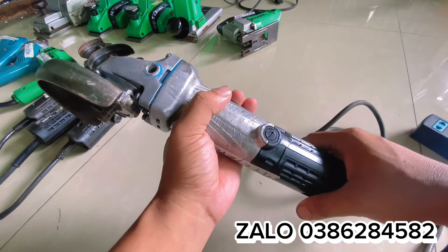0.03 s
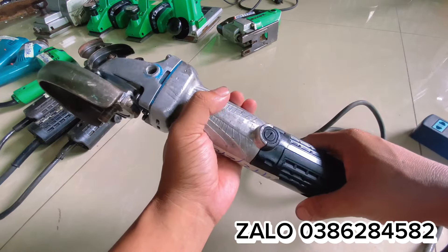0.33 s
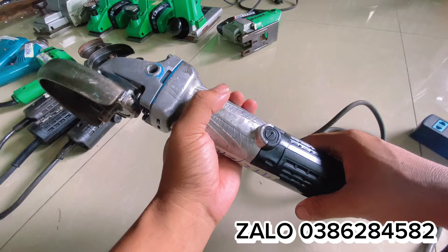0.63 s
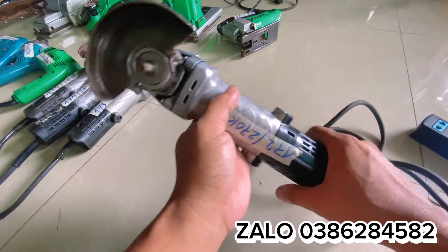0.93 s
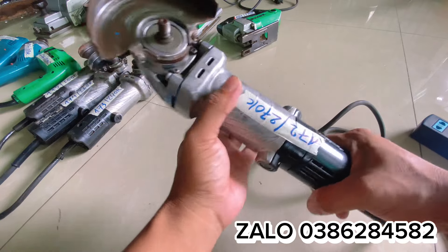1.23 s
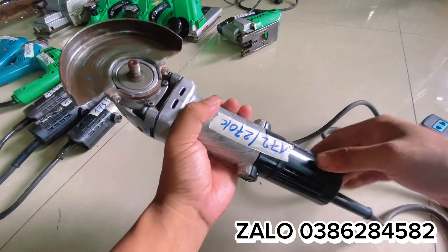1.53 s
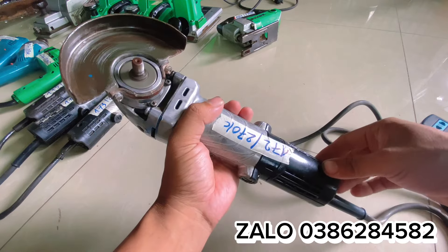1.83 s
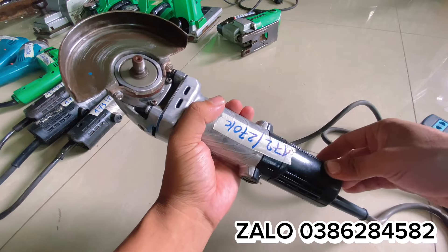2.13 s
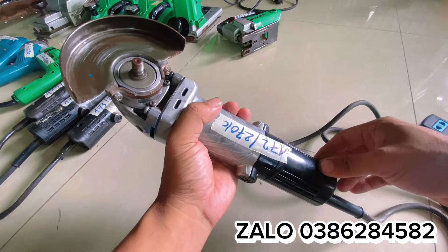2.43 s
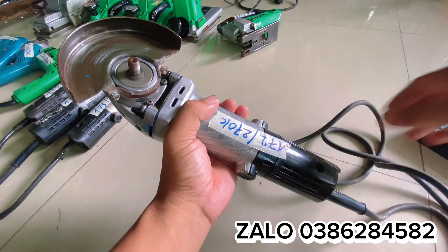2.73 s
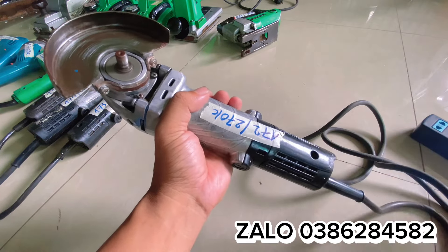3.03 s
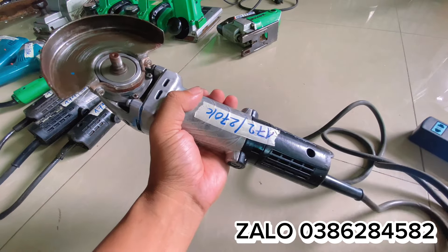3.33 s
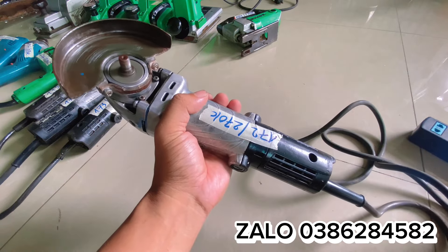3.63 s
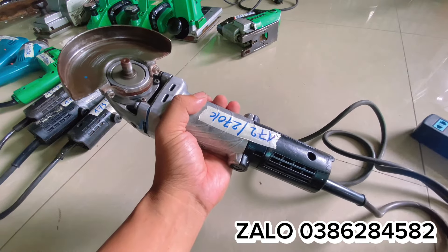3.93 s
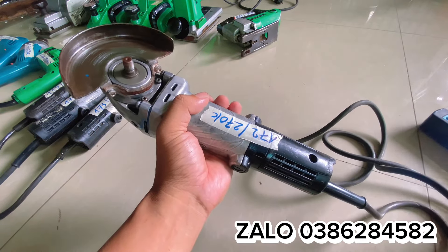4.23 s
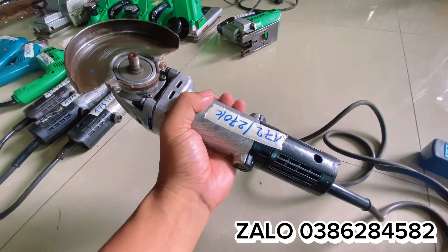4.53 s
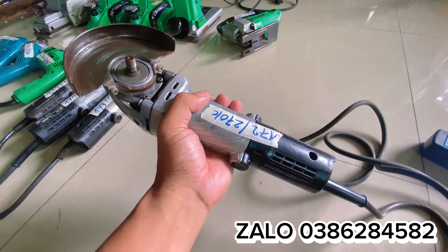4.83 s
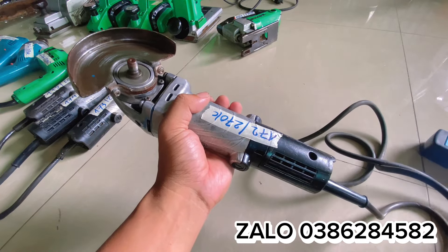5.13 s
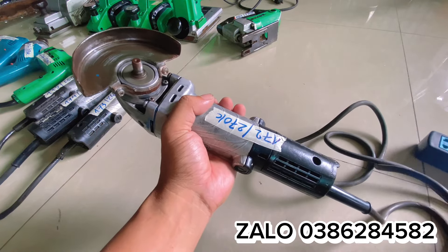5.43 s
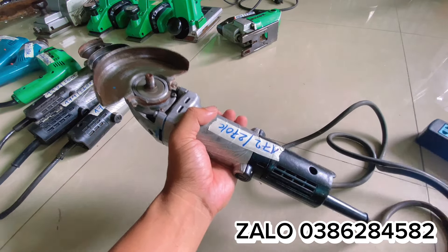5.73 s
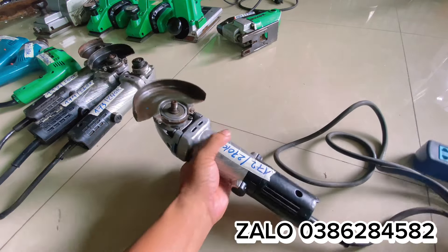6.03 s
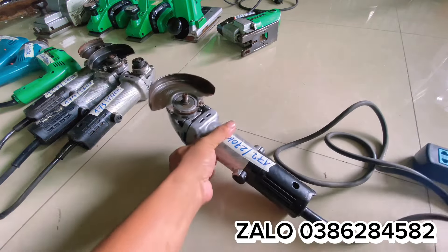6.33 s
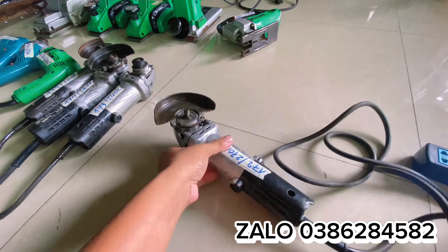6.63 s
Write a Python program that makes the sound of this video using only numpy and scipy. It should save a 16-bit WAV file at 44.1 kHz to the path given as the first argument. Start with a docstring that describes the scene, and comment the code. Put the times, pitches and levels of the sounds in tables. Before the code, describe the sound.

From the start, an angle grinder is running at full speed with no load: a high, steady whine over rushing fan air and a metallic gear chatter. Its tone shifts slightly as it is turned in the hands, with a soft handling bump at about 0.9 seconds and a few sharp clacks between 1 and 2 seconds. At about 2 seconds it is switched off and begins coasting. The whine glides steadily down and the rush of air fades. From about 4 to 6 seconds the slack gears stand out as irregular clicks and ticks, growing softer as the motor slows. A faint, grainy metal rasp comes at about 5.8 seconds. From 6.2 to 6.8 seconds the tool stops and is laid on a tiled floor with several clinks and dull thuds, the strongest near 6.7 seconds. It is heard close up in a hard room with short reverberation.

```python
"""Angle grinder coasting down

With no disc, it runs free in a hand, is switched off at two seconds and coasts to a stop.
Its fan rushes, shaft, ball bearings and brushes whine, and slack bevel gears chatter in the metal
head, ever more sparsely. It is laid on a tiled floor with a rasp, clinks and thuds.
A close pair of microphones hears it in a hard room."""
import sys
import numpy as np
from scipy import signal
from scipy.fft import rfft, irfft, next_fast_len
from scipy.io import wavfile
from scipy.ndimage import uniform_filter1d

SR = 44100
rng = np.random.default_rng(int(sys.argv[2]) if len(sys.argv) > 2 else 0)


def log_audio(samples):
    """Write samples as a 16-bit WAV file to the path given in sys.argv[1]."""
    # one column per channel
    frames = np.atleast_2d(samples).T
    # limit to full scale, then quantise
    limited = np.clip(frames, -1, 1)
    pcm = np.round(limited * 32767).astype(np.int16)
    wavfile.write(sys.argv[1], SR, pcm)


N = 303849

# roll of the tool in the hands: t/s, angle/quarter turns
ROLL_ANGLE = [(0.4, 0), (0.95, 1), (1.5, 2)]
# modes of gear head and guard: f/Hz, width/Hz, lift/dB
HEAD_MODES = [(1380, 130, 2.5), (2340, 200, 0.5), (2890, 260, 2), (4810, 340, 3.5), (6093, 173, 12),
              (6940, 74, 13.5)]
# loudest backlash clacks: t/s, crack/dB, head ring/dB re crack
BACKLASH_CLACKS = [(1.0885, -18, -20), (1.212, -15.5, -18.5), (1.766, -12.5, -24), (3.9854, -19, -17),
                   (4.2926, -22, -12), (4.421, -26, -4), (4.558, -25, -9), (4.578, -21.5, -11),
                   (4.6772, -20.5, -8), (4.744, -28, -7), (4.77, -32, -3), (4.787, -30, -2),
                   (4.807, -28, -9), (4.9575, -29, -8), (5.005, -32, -6), (5.164, -30, -5),
                   (5.177, -34, -3), (5.2, -33, -2), (5.2329, -20, -10), (5.281, -36, 3), (5.307, -35, -2),
                   (5.347, -37, -10.5), (5.382, -30, -5), (5.415, -30, -2), (5.435, -35, -2),
                   (5.4605, -28.5, -2), (5.4955, -28, -7), (5.556, -31, -4), (5.637, -30, -3),
                   (5.661, -31.5, -3), (5.6989, -28.5, -9), (5.7538, -33, -4), (5.7875, -31, -10),
                   (5.818, -28, -17), (5.871, -37, -7), (5.897, -35, -13), (5.9075, -39, -2),
                   (5.9265, -34.5, -4), (5.9455, -34, -18), (6.1034, -40, -14)]
# low rumble of room and grip: f/Hz, density/dB
RUMBLE_SPECTRUM = [(20, -30), (55, 0), (90, -2), (140, -11), (400, -16), (1000, -22), (4000, -30),
                   (8000, -43), (15000, -60)]


def amp(db):
    """Decibels to gain."""
    return 10 ** (np.asarray(db) / 20)


def unit(x):
    """Scale to rms 1."""
    return x / np.sqrt(np.mean(x ** 2) + 1e-20)


def along(points, hz):
    """Interpolate (f/Hz, value) points on a log axis."""
    f, v = np.transpose(points)
    return np.interp(np.log(hz + 1), np.log(f + 1), v)


def curves(rows):
    """One value per sample for each column after the time."""
    s, *cols = np.transpose(rows)
    return [np.interp(np.arange(N) / SR, s, c) for c in cols]


def wobble(rate_hz):
    """Smooth random curve through rate_hz knots a second."""
    knots = rng.standard_normal(int(N * rate_hz / SR) + 4)
    fine = signal.resample(knots, len(knots) * 10)
    return np.interp(np.arange(N) * rate_hz * 10 / SR, np.arange(len(fine)), fine)


def resonance(hz, centre_hz, width_hz):
    """Bell curve, 1 at its centre."""
    return 1 / (1 + (2 * (hz - centre_hz) / width_hz) ** 2)


def filtered(x, response):
    """Apply a complex frequency response."""
    m = 2 * next_fast_len((N + SR // 2) // 2)
    return irfft(rfft(x, m) * response(np.fft.rfftfreq(m, 1 / SR)), m)[..., :N]


def coloured(x, spectrum, modes=(), size=8192):
    """Minimum-phase filter of unit power: a broad spectrum plus resonances."""
    hz = np.fft.rfftfreq(size, 1 / SR)
    db = along(spectrum, hz) + sum(lift * resonance(hz, f, width) for f, width, lift in modes)
    cepstrum = irfft(np.log(unit(amp(db))))
    cepstrum[1:len(hz) - 1] *= 2
    cepstrum[len(hz):] = 0
    impulse = irfft(np.exp(rfft(cepstrum)))
    return signal.oaconvolve(x, impulse[None], axes=1)[:, :N]


def bursts(times_s, sizes, t60_s):
    """Envelope that jumps at each time and decays."""
    power = np.bincount(np.clip(times_s * SR, 0, N - 1).astype(int), sizes ** 2, N)
    decay = np.exp(-2 * np.log(1000) / (t60_s * SR))
    return np.sqrt(signal.lfilter([1], [1, -decay], power))


def hiss():
    """White noise of a spread-out source: each microphone hears a shared part and its own."""
    # unshared part: f/Hz, level/dB re shared
    spread = [(100, -10), (600, 0), (1300, -13.5), (1950, -5.5), (2300, -5.5), (2850, -7.5), (3200, -4),
              (3700, -3), (4200, 5), (4600, -8), (5100, 15.5), (6000, -16), (7100, -2), (8300, 4),
              (14000, 26)]
    m = 2 * next_fast_len(N // 2 + 1, real=True)
    own = amp(along(spread, np.fft.rfftfreq(m, 1 / SR)))
    z = rfft(rng.standard_normal((3, m)))
    return irfft((z[0] + own * z[1:]) / np.hypot(1, own), m)[:, :N]


def shaft_speed(friction_rps_per_s=83.8, drag_rps=401.4):
    """Turns/s: powered, then braked by dry friction and square-law fan drag, equal at drag_rps."""
    # sag under power, switch-off at the last row: t/s, speed/rps
    powered = [(0, 577), (0.2, 573.5), (0.5, 571.8), (1.2, 571.2), (1.5, 568.8), (2.036, 566)]
    off_s, off_rps = powered[-1]
    t = np.arange(N) / SR
    braking = friction_rps_per_s / drag_rps * np.maximum(t - off_s, 0)
    coast_rps = drag_rps * np.tan(np.arctan(off_rps / drag_rps) - braking)
    return np.maximum(np.where(t < off_s, curves(powered)[0], coast_rps), 1)


def coast_db(rps, full_db, fall_db, knee_halvings=0, stall_db=0):
    """Level that loses fall_db per halving of speed, and stall_db more per halving past the knee."""
    halvings = np.log2(rps.max() / rps)
    return full_db - fall_db * halvings - stall_db * np.maximum(halvings - knee_halvings, 0)


def fan(air_db):
    """Cooling air rushes out through the vents."""
    # fan air: f/Hz, density/dB
    air = [(40, -43), (150, -27.5), (340, -15.5), (500, -16), (800, -8), (1000, -9), (1250, 2), (1500, 0.5),
           (1950, -4.5), (2500, -6.5), (4000, 0.5), (7000, -13.5), (10500, -21), (15000, -82.5)]
    # cavities behind the vents: f/Hz, width/Hz, lift/dB
    cavities = [(4810, 300, 4.5), (5840, 68, 11), (6190, 79, 8.5), (6970, 130, -3)]
    return amp(air_db + 5.5 + 0.9 * wobble(14)) * coloured(hiss(), air, cavities)


def bearing_shimmer(rps, air_db, passes_per_turn=2.79, width_orders=0.012, steps_per_turn=128):
    """Ball-pass overtones, split by the shaft's turning: faint, wavering partials that fall with speed."""
    # bearing overtones: f/Hz, density/dB
    spectrum = [(900, -23), (1400, -4), (2700, -13), (3300, 6), (5000, -0.5), (7000, -17), (9000, -38)]
    turns = np.cumsum(rps) / SR
    m = 2 * next_fast_len(int(turns[-1] * steps_per_turn) // 2 + 1)
    orders = np.fft.rfftfreq(m, 1 / steps_per_turn)
    offsets = [(orders - k * passes_per_turn + 0.5) % 1 - 0.5 for k in range(1, 5)]
    lines = sum(np.exp(-(offset / width_orders) ** 2) for offset in offsets)
    band = (orders > 6) & (orders < steps_per_turn / 4)
    pattern = irfft(rfft(rng.standard_normal(m)) * lines * band, m)
    swarm = np.interp(turns * steps_per_turn, np.arange(m), unit(pattern))
    return amp(air_db + 1 + 2.2 * wobble(70)) * coloured(swarm[None], spectrum)


def gears(rps, chatter_db, scatter_db=4.0, soft_share=0.83):
    """Slack teeth strike at random and ring the head, fewer and softer as the shaft slows."""
    # hard tooth impacts: f/Hz, density/dB
    hard_spectrum = [(100, -54), (600, -27.5), (900, -17.5), (1070, -25.5), (1400, -10), (2500, -4),
                     (3300, 6), (4200, -5.5), (5500, -6.5), (6950, -6), (7300, -20), (8000, -17.5),
                     (8800, -25.5), (11000, -29.5), (12500, -90), (15000, -55)]
    # slow, soft contacts: f/Hz, density/dB
    soft_spectrum = [(500, -23.5), (850, -3.5), (1070, -16), (1350, -2), (1650, -6), (2400, -3.5),
                     (2700, -2.5), (3000, -1.5), (3250, 1.5), (3480, -2), (3650, 9), (3850, -2.5),
                     (4000, -7), (4250, -3), (5000, -8.5), (7000, -38)]
    hits_per_s = 2.5 * (rps + 60)
    hits = rng.random(N) < hits_per_s / SR
    sizes = amp(scatter_db * np.clip(rng.standard_normal(N), -2, 2))[hits]
    strikes = bursts(np.flatnonzero(hits) / SR, sizes, t60_s=0.023)
    chatter = amp(chatter_db + 1.5) * unit(strikes / np.sqrt(hits_per_s))
    softness = np.clip(soft_share * (1 - rps / rps.max()), 0, 1)
    clack_s, crack_db, _ = np.transpose(BACKLASH_CLACKS)
    clacks = bursts(clack_s + 0.0016, amp(crack_db - 0.5), t60_s=0.02)
    blows = np.hypot(np.sqrt(1 - softness) * chatter, clacks)
    hard = coloured(uniform_filter1d(blows, size=30) * hiss(), hard_spectrum, HEAD_MODES)
    return hard + coloured(np.sqrt(softness) * chatter * hiss(), soft_spectrum)


def tones(rows, rps, slip, flutter_db=2.5, swell_octaves=0.31):
    """Beamed, shaft-locked sines glide through the casing's response; slip blurs them as it slows."""
    # casing radiation: f/Hz, gain/dB
    radiation = [(200, -16), (330, -5.5), (540, -13.5), (700, -2.5), (820, 1.5), (940, 1.5), (1040, -5),
                 (1150, -1.5), (1320, 7.5), (1480, 5), (1600, -2.5), (1880, -2), (2150, -0.5), (2450, 3.5),
                 (2740, -4.5), (2950, -2), (3180, 6.5), (3400, 5), (3750, 6), (4300, -3), (4900, 6.5)]
    angle = 2 * np.pi * np.cumsum(rps) / SR
    halvings = np.log2(rps.max() / rps)
    below_half = np.maximum(halvings - 1, 0)
    roll, = curves(ROLL_ANGLE)
    out = np.zeros(N)
    for order, *facing_db, half_db, swell_hz, swell_db in rows:
        hz = order * rps
        full_db = np.interp(roll, np.arange(len(facing_db)), facing_db)
        db = full_db + (half_db - full_db) * np.minimum(halvings, 1) - 12 * below_half
        db += swell_db * np.exp(-(np.log2(hz / swell_hz) / swell_octaves) ** 2)
        jitter_rad = slip * np.sqrt(order) * (1 + 1.6 * below_half) * wobble(60)
        wave = np.sin(order * angle + jitter_rad + rng.uniform(0, 2 * np.pi))
        out += np.sqrt(2) * amp(db + along(radiation, hz) + flutter_db * wobble(25)) * wave
    return out


def whine(rps, hum_db):
    """The unbalanced armature hums; its harmonics and the rolling balls sing through the casing."""
    # unbalance hum through the casing: f/Hz, level/dB
    hum_response = [(100, -88), (180, -72), (250, -60.5), (340, -53), (460, -51), (535, -37), (575, -39.5)]
    # shaft harmonics: order, full-speed level/dB (as first held, side-on, turned over),
    # half-speed level/dB, swell f/Hz, swell/dB
    shaft_tones = [(2, -45.5, -35.5, -42.5, -58.5, 425, 9.5), (3, -40, -40.5, -52, -60.5, 635, 10.5),
                   (4, -37.5, -39.5, -45, -59.5, 1510, 2)]
    # ball-pass tones and sidebands: same columns
    bearing_tones = [(1.79, -57, -51, -60, -63, 750, 11), (2.578, -40, -44, -42.5, -54, 316, 10),
                     (2.79, -44.5, -42.5, -40, -48.5, 720, 6), (3.58, -56, -61, -62, -59, 1630, 13),
                     (4.58, -37, -49, -43, -53.5, 1700, 10.5), (4.79, -33.5, -28, -36, -52, 1240, 9),
                     (5.58, -49, -58, -45.5, -55.5, 790, 8), (6.37, -61, -60, -48, -61, 2280, 9),
                     (6.585, -40, -37, -35.5, -54, 2300, 6), (7.59, -34.5, -37, -39.5, -60.5, 900, 10),
                     (7.68, -58, -57, -70, -49, 1900, 4), (8.575, -56, -52, -44, -56.5, 2550, 9),
                     (9.7, -68, -69, -75, -48, 1680, 4), (10.37, -55, -46, -51, -59, 2500, 8)]
    angle = 2 * np.pi * np.cumsum(rps) / SR
    hum = np.sqrt(2) * amp(along(hum_response, rps) + hum_db + 0.1 * wobble(17)) * np.sin(angle)
    harmonics = amp(-1.5) * tones(shaft_tones, rps, slip=0.21)
    return hum + harmonics + amp(-1.3) * tones(bearing_tones, rps, slip=0.13)


def brushes(rps, bars=24, octave_rps=130, octave_limit_hz=15200):
    """Carbon brushes whistle over the commutator bars; slowing, they gain an octave and hiss less."""
    # whistle through the brush holders: f/Hz, level/dB
    holders = [(1500, -84), (3000, -70), (4400, -64), (5400, -59), (6100, -58), (6900, -78), (8200, -72),
               (9000, -63), (10200, -56), (12000, -68), (13700, -60.5)]
    # brush friction: f/Hz, density/dB
    friction = [(2000, -26), (6800, -36.5), (7700, -6), (8700, 29), (10500, -1), (12500, -43), (15000, -30)]
    hz = bars * rps
    angle = 2 * np.pi * np.cumsum(hz) / SR + 0.4 * wobble(40)
    fundamental = amp(along(holders, hz)) * np.sin(angle)
    octave_db = along(holders, 2 * hz) - 25 * np.maximum(np.log2(rps / octave_rps), 0)
    octave = (2 * hz < octave_limit_hz) * amp(octave_db) * np.sin(2 * angle)
    facing_db = 4 * np.maximum(curves(ROLL_ANGLE)[0] - 1, 0) * (rps / rps.max()) ** 2
    whistle = np.sqrt(2) * amp(facing_db + 3 * wobble(33)) * (fundamental + octave) * (rps > 1)
    return whistle + amp(coast_db(rps, full_db=-49, fall_db=13)) * coloured(hiss(), friction)


def room(x, delay_samples=150):
    """Hard-room reverberation: decay varies with frequency, and each microphone has its own tail."""
    # room decay: f/Hz, t60/s
    decay = [(150, 0.57), (1000, 0.71), (4000, 0.56), (12000, 0.18)]
    send_db = [(200, -11), (570, -21), (1100, -13), (6000, -12)]  # f/Hz, gain/dB
    hz, t, z = signal.stft(rng.standard_normal((2, SR // 2)), SR, nperseg=256)
    tail = signal.istft(z * amp(-60 * t / along(decay, hz)[:, None]), SR, nperseg=256)[1]
    send = filtered(x, lambda f: amp(along(send_db, f)))
    delayed = np.pad(send, [(0, 0), (delay_samples, 0)])
    return signal.fftconvolve(delayed, tail / np.linalg.norm(tail[0]), axes=1)[:, :N]


def room_rumble():
    """The room's low rumble, swelling a little as the hands move."""
    # rumble: t/s, level/dB
    levels = [(0, -65), (1.3, -62), (1.55, -75), (2.8, -70.5), (3.2, -68), (5.8, -65.5), (6.6, -68.5)]
    noise = rng.standard_normal(N) + 0.64 * rng.standard_normal((2, N))
    return amp(curves(levels)[0]) * coloured(noise, RUMBLE_SPECTRUM)


def grip(at_s=0.87, width_s=0.069, rumble_db=-48, pan_db=7.0):
    """The shifting grip bumps and briefly rumbles, mostly on the left."""
    # soft bumps of the hands: t/s, level/dB, f/Hz, half-width/s
    bump_rows = [(0.873, -34, 210, 0.005), (.896, -30, 227, 0.0025), (.897, -42, 343, 0.016),
                 (0.906, -36.5, 140, 0.0059), (0.917, -42.5, 55, 0.025), (5.972, -51.5, 410, 0.0026),
                 (5.978, -55, 290, 0.004)]
    t = np.arange(N) / SR
    bumps = sum(amp(db) * np.exp(-((t - s) / half_s) ** 2) * np.sin(2 * np.pi * hz * (t - s))
                for s, db, hz, half_s in bump_rows)
    swell = np.exp(-((t - at_s) / width_s) ** 2)
    rumble = amp(rumble_db) * swell * coloured(rng.standard_normal((2, N)), RUMBLE_SPECTRUM)
    return amp([[pan_db], [-pan_db]]) * (bumps + rumble)


def head_ring(mode_hz=3635, t60_s=0.012, attack_s=0.0011, lift_db=7.5):
    """Hard clacks ring the head's strongest mode, in step at both microphones."""
    out, t = np.zeros(N), np.arange(SR // 20) / SR
    for at_s, crack_db, ring_db in BACKLASH_CLACKS:
        hz = mode_hz * (1 + rng.normal(0, 0.01))
        envelope = amp(crack_db + ring_db + lift_db - 60 * t / t60_s) * (1 - np.exp(-t / attack_s))
        out[round(at_s * SR):][:len(t)] += envelope * np.sin(2 * np.pi * hz * t)
    return out


def rasp(grains_per_s=170, start_s=5.82, attack_s=0.041, end_s=6.56, release_s=0.16, fade_db_per_s=14):
    """Faint, grainy rasp of metal as the tool comes to rest."""
    # metal rasp: f/Hz, density/dB
    spectrum = [(300, -15), (850, -5), (1070, -10), (1500, 5), (1950, 5), (2450, -17), (3200, 4),
                (3750, -6), (4300, -22.5), (7000, -8.5), (9000, -53)]
    t = np.arange(N) / SR
    times_s = np.flatnonzero(rng.random(N) < grains_per_s / SR) / SR
    grains = unit(bursts(times_s, amp(2.8 * rng.standard_normal(len(times_s))), t60_s=0.018))
    gate = np.clip(np.minimum((t - start_s) / attack_s, (end_s - t) / release_s), 0, 1)
    level_db = -50 - fade_db_per_s * np.maximum(t - start_s - attack_s, 0)
    return gate * amp(level_db) * coloured(grains * hiss(), spectrum, HEAD_MODES)


def floor_knocks(note_t60_s=0.063, note_attack_s=0.002):
    """Each touch on the tiles clinks the guard and thuds the body, which gives a short, dull note."""
    # floor contacts: t/s, level/dB, thud/dB re level, body note f/Hz, note/dB re level
    contacts = [(6.217, -30, -11, 555, -9), (6.284, -38.5, -8, 530, -8), (6.356, -38, -28, 550, -28),
                (6.622, -51, -10, 550, -28), (6.6318, -39.5, -15, 554, -31),
                (6.6966, -26.5, -3.5, 256, -18), (6.734, -24.5, -8, 182, -10), (6.796, -41, -4, 300, -19)]
    # steel guard on tile: f/Hz, density/dB
    guard = [(300, -9), (2000, 5.5), (4000, 5), (6000, 1.5), (7000, 8), (7800, -16), (11000, -40),
             (15000, -59)]
    # tool body on tile: f/Hz, density/dB
    body = [(40, -36), (120, -7.5), (190, 0.5), (310, -1.5), (440, -8), (560, -4), (700, -10.5), (870, -6),
            (1060, -22), (1400, -4), (1750, 0), (2000, -16), (2400, -25), (5000, -17), (12000, -46)]
    times_s, db, thud_db, _, _ = np.transpose(contacts)
    clink = coloured(bursts(times_s, amp(db - 6), t60_s=0.061) * hiss(), guard, HEAD_MODES)
    blows = bursts(times_s, amp(db + thud_db - 2), t60_s=0.11)
    thud = coloured(uniform_filter1d(blows, size=60) * hiss(), body)
    note, t = np.zeros(N + SR), np.arange(SR // 8) / SR
    for at_s, level_db, _, hz, note_db in contacts:
        envelope = amp(level_db + note_db - 60 * t / note_t60_s) * (1 - np.exp(-t / note_attack_s))
        note[round(at_s * SR):][:len(t)] += envelope * np.sin(2 * np.pi * hz * t)
    return clink + thud + note[:N]


def scene(beam_hz=5000, beam_width_hz=500, lead_s=0.00018):
    """The head, left of centre, reaches the left microphone first; the brushes lie straight ahead."""
    # directivity as the tool rolls: t/s, chatter/dB, air/dB, hum/dB, beamed band/dB
    facing = [(0, 0.5, 1.5, 1, -1), (.55, 1, 0.7, 1.5, -1), (.75, 3, 1, 1, -3.5), (1.0, 0, 3, 1, -7),
              (1.35, 1.8, 1.5, 0.3, 0), (1.85, 2, 1.5, -2, 0.5), (2.2, -1, 0.5, -4, 0.5),
              (2.6, -0.5, 0.5, -1, -1.5)]
    # casing modes, out of step to the two sides: f/Hz, width/Hz, lift/dB, extra left lead/rad
    casing = [(1004, 176, 0.5, 1.8), (1600, 130, -1.5, -0.78), (1667, 160, -3, 0.054),
              (1920, 130, -2.5, 0.063), (2440, 240, 2.5, 0.14), (2700, 140, -0.5, 0.092),
              (2716, 50, -2, -1.15), (2890, 100, -2, 0.014), (4340, 300, -1, -0.63), (6020, 960, -1.5, -1),
              (7180, 480, -1, 1.28)]
    # balance: f/Hz, left minus right/dB
    balance = [(60, -1.5), (200, 0), (350, 1.5), (570, 0.5), (720, 1), (900, -6), (1150, 5), (1600, -2),
               (2300, -2), (3400, 2.5), (4300, 1), (6800, 0), (8400, -4), (11000, 1)]

    def casing_gain(hz):
        return amp(sum(db * resonance(hz, f, width) for f, width, db, _ in casing))

    def lead_rad(hz):
        return 2 * np.pi * hz * lead_s + sum(rad * resonance(hz, f, width) for f, width, _, rad in casing)

    rps = shaft_speed()
    chatter_db, air_db, hum_db, beam_db = curves(facing)
    air_db += coast_db(rps, full_db=-33.5, fall_db=9.5)
    chatter_db += coast_db(rps, full_db=-29, fall_db=5.5, knee_halvings=4, stall_db=7)
    tool = fan(air_db) + bearing_shimmer(rps, air_db) + gears(rps, chatter_db) + floor_knocks() + rasp()
    # one treble band is beamed, so it comes and goes as the tool turns
    beam = filtered(tool, lambda hz: np.exp(-((hz - beam_hz) / beam_width_hz) ** 2))
    tool += (amp(beam_db) - 1) * beam
    tool = filtered(tool, casing_gain) + whine(rps, hum_db)
    sides = np.array([[1], [-1]])
    direct = filtered(tool, lambda hz: np.exp(0.5j * sides * lead_rad(hz)))
    ring = head_ring()
    mix = direct + ring + brushes(rps) + room(tool + ring) + grip() + room_rumble()
    return filtered(mix, lambda hz: amp(sides * along(balance, hz) / 2))


def record(dry):
    """Brick-wall low-pass at 15.2 kHz."""
    return filtered(dry, lambda hz: hz < 15200)


dry = scene()
out = record(dry)
log_audio(out)
```